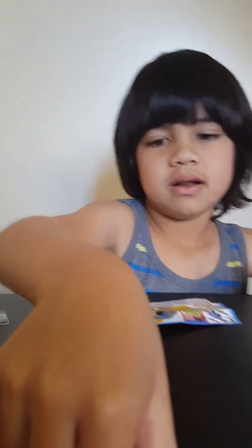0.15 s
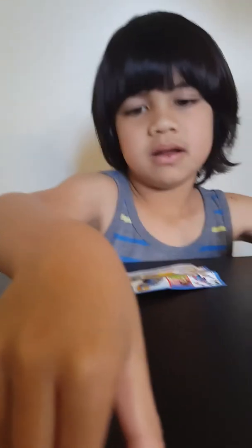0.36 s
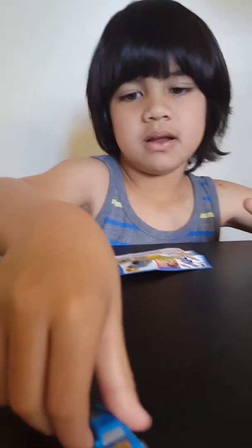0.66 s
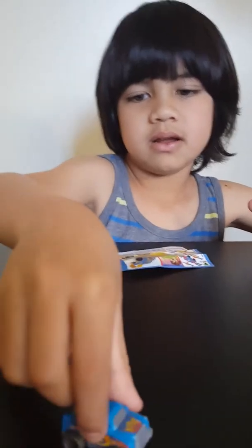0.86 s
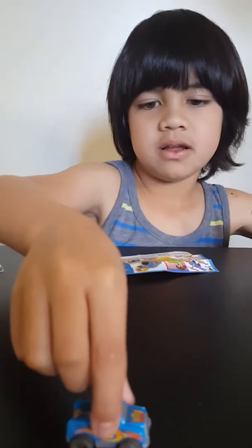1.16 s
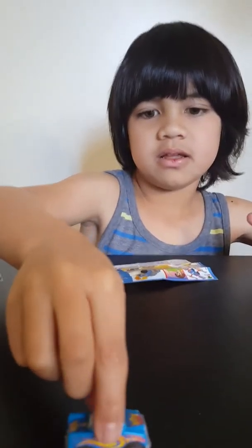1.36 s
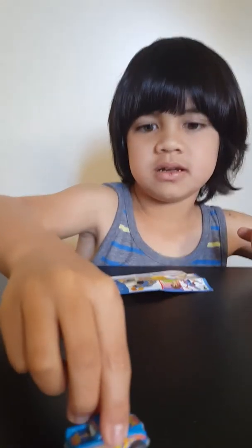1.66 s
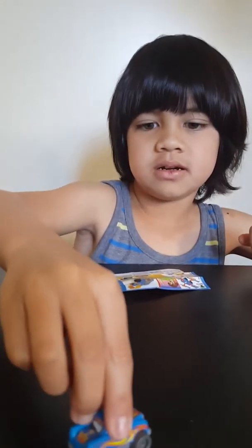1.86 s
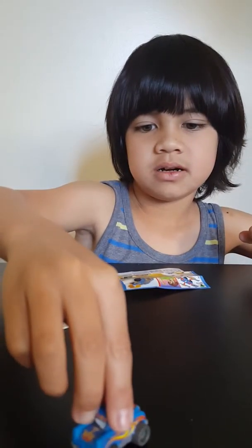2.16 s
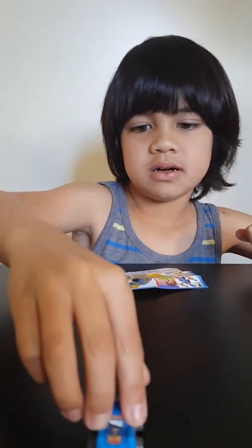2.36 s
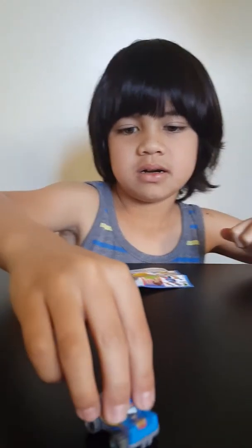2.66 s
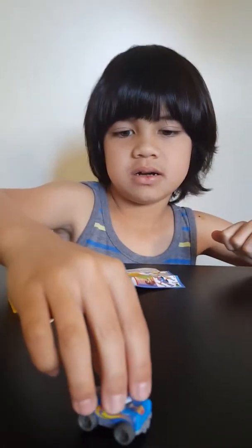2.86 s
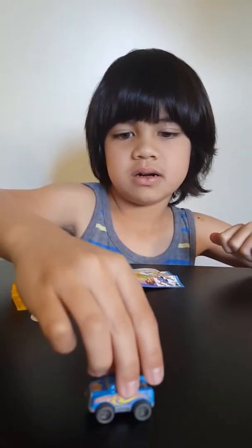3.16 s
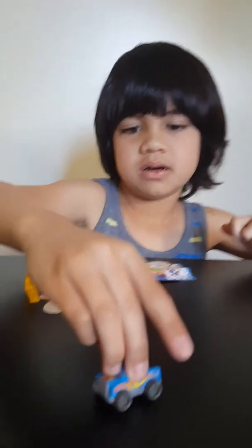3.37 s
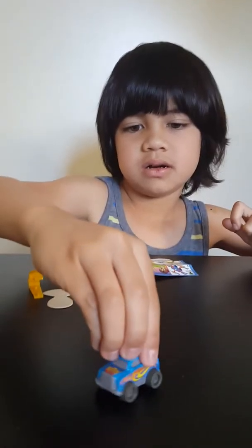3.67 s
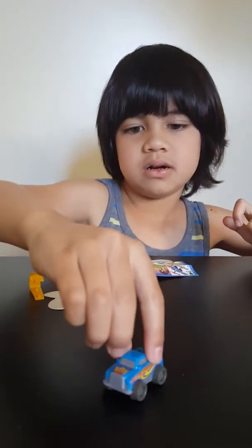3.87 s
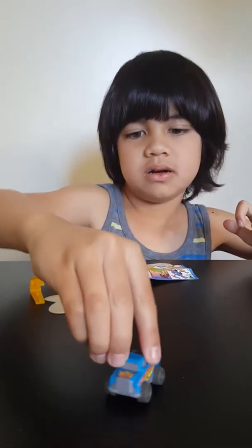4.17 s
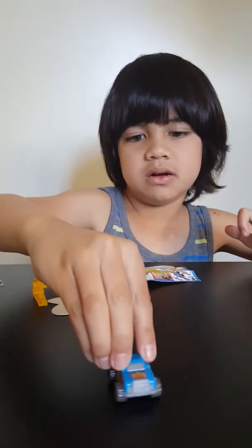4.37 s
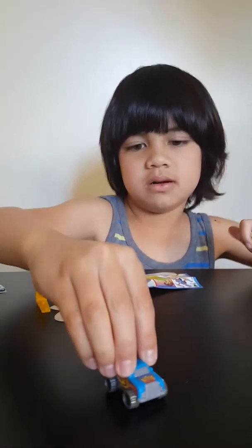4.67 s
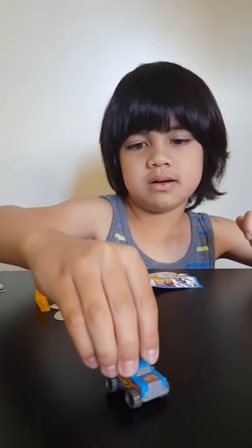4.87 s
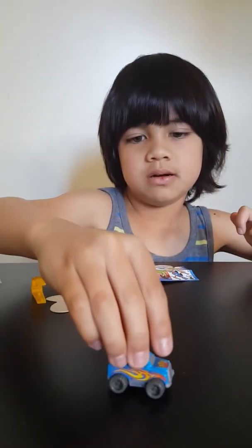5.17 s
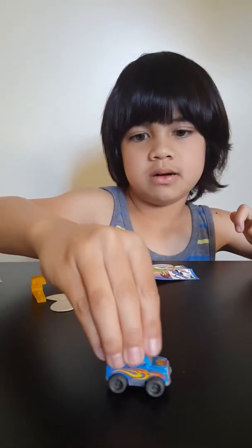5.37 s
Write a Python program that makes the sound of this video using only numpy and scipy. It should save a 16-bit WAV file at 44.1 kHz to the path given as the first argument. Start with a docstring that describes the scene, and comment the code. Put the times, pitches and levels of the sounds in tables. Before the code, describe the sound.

Close, dry scraping and hollow rattling of a toy car's wheels on a tabletop, strongest early, then fading into lighter scuffs toward the left.

```python
"""Toy car on a wooden table

A small plastic toy car is pushed in uneven spurts over a wooden table, close to a camera that stands on it.
Bursts of tiny random blows ring the tabletop modes and rasp in the hollow shell; filtered noise makes
the hiss and axle ticks at the right microphone. Rough low noise and wavering sines rumble under presses,
and trains of soft pulses make a few knocks. The car drifts away to the left, in a quiet room.
"""
import sys
import numpy as np
from scipy import signal
from scipy.fft import rfft, irfft
from scipy.io import wavfile
from scipy.ndimage import map_coordinates

SR = 44100
rng = np.random.default_rng(int(sys.argv[2]) if len(sys.argv) > 2 else 0)


def master(y):
    """Save y as 16-bit WAV."""
    cut = np.clip(np.atleast_2d(y).T, -1, 1)
    pcm = np.round(cut * 32767)  # scale
    wavfile.write(sys.argv[1], SR, pcm.astype(np.int16))


N = 243873
TIME = np.arange(N) / SR  # s
HZ = np.fft.rfftfreq(16384, 1 / SR)  # frequency grid of the filters

# Path of the car, and which tabletop modes it shakes best on the way; all levels relative:
# (time [s], left over right [dB], low modes [dB], upper over middle modes [dB])
CAR_PATH = [(0.18, -8, -11, -2.5), (0.54, -6.5, 6, -1.5), (0.72, -4.5, -0.5, -5), (1.08, -4.5, 0, 3),
            (1.23, -2.5, -7.5, -10), (1.45, -6.5, -1, 1.5), (1.85, -2.5, 3, 3), (2.03, -4.5, -13.5, -13.5),
            (2.3, -3.5, -1.5, -5.5), (2.55, -4.5, -6, 5.5), (2.72, -2, -10, 0), (3.0, -1.5, -3.5, .5),
            (3.3, 1, -2, 4.5), (3.44, 3, 5, 10), (3.72, 8.5, -2, 9.5), (3.82, 6, -4.5, -3),
            (4.2, 6.5, 1, 12), (4.45, 8.5, 2.5, 3), (4.97, 8, -1, 3), (5.05, 5.5, 3, 1), (5.15, 6, 8, 4),
            (5.29, 18, -19, 7)]
# Pushes of the hand, relative levels; the rasp level also drives the rolling hiss:
# (start [s], length [s], rise [s], tabletop ring [dB], rasp of the wheels [dB])
HAND_PUSHES = [(0.0, 0.05, 0.0027, -38.5, -45), (0.06, 0.14, 0.036, -43, -50.5),
               (0.122, 0.097, 0.052, -32, -35), (0.25, 0.059, 0.0079, -41.5, -42),
               (0.35, 0.083, 0.02, -56.5, -51.5), (0.45, 0.021, 0.0034, -43, -42.5),
               (0.48, 0.19, 0.029, -45.5, -47.5), (0.62, 0.11, 0.037, -41, -41.5),
               (0.755, 0.051, 0.0035, -45.5, -46), (0.825, 0.11, 0.026, -38.5, -43.5),
               (0.98, 0.026, 0.005, -49.5, -49), (1.033, 0.017, 0.0075, -36.5, -42.5),
               (1.205, 0.011, 0.006, -46, -55), (1.22, 0.033, 0.016, -43, -58.5),
               (1.36, 0.0076, 0.0029, -48.5, -54), (1.426, 0.011, 0.0051, -44, -50.5),
               (1.478, 0.012, 0.0093, -42.5, -46), (1.528, 0.039, 0.023, -44.5, -46.5),
               (1.66, 0.051, 0.016, -52, -59.5), (1.765, 0.1, 0.076, -50, -54.5),
               (2.022, 0.016, 0.0038, -42.5, -57), (2.058, 0.066, 0.024, -50, -62.5),
               (2.21, 0.085, 0.012, -40, -48.5), (2.28, 0.068, 0.033, -37.5, -44),
               (2.46, 0.067, 0.025, -43.5, -55.5), (2.512, 0.08, 0.02, -32.5, -42),
               (2.606, 0.12, 0.016, -36, -46), (2.835, 0.023, 0.0071, -44, -57.5),
               (2.88, 0.25, 0.09, -45, -53.5), (2.997, 0.029, 0.023, -41, -42),
               (3.15, 0.12, 0.038, -46, -56.5), (3.27, 0.037, 0.014, -41.5, -52),
               (3.372, 0.035, 0.0074, -50, -56), (3.49, 0.0065, 0.0039, -59.5, -60),
               (3.594, 0.011, 0.0062, -54.5, -61), (3.62, 0.098, 0.014, -61.5, -70),
               (3.688, 0.054, 0.022, -47, -53.5), (3.755, 0.047, 0.031, -46.5, -51.5),
               (4.13, 0.022, 0.0067, -51.5, -59.5), (4.19, 0.041, 0.013, -45, -50),
               (4.294, 0.11, 0.037, -44.5, -47), (4.42, 0.02, 0.0085, -51.5, -65),
               (4.525, 0.02, 0.0089, -54.5, -70), (4.648, 0.043, 0.0038, -58.5, -68),
               (4.948, 0.075, 0.02, -46.5, -49), (5.085, 0.056, 0.015, -53.5, -52),
               (5.264, 0.012, 0.0084, -55, -91)]
# Resonant modes of the wooden tabletop, relative levels:
# (frequency [Hz], nominal width [Hz], left microphone [dB], right microphone [dB])
TABLE_MODES = [(168.6, 21, -37, -15), (279.7, 13.1, 2.5, -1), (340, 51, -13, -10.5), (442, 35.7, -5.5, 0),
               (557, 59, -21, -5.5), (648.6, 38, 0.5, 3.5), (834, 34.4, -7, -4.5), (858.4, 29, -3.5, -7),
               (850, 184, -7, -7), (1236, 49, -12.5, -78)]
# Spectrum of the low shaking of the wood: (frequency [Hz], relative level [dB])
RUMBLE_SPECTRUM = [(25, -37), (55, -16), (90, -5.5), (135, 1.5), (200, -14), (400, -13.5), (1000, -50),
                   (4000, -67)]

RASP_RELEASE_S = 0.022  # the shell's rasp dies with the push


def amp(db):
    """Amplitude factor of a level in dB."""
    return 10 ** (np.asarray(db) / 20)


def unit(x):
    """Scales to an rms of one."""
    return x / np.sqrt(np.mean(x ** 2) + 1e-20)


def curve(rows, axis=1):
    """One column of a table, joined by straight lines in time."""
    rows = np.array(rows)
    return np.interp(TIME, rows[:, 0], rows[:, axis])


def read(points, hz):
    """One value per frequency, joined by straight lines in log frequency."""
    f, value = np.transpose(points)
    return np.interp(np.log(hz + 1), np.log(f + 1), value)


def ring(x, gain):
    """Passes x through the causal minimum-phase filter that has this gain at HZ."""
    cepstrum = irfft(np.log(np.maximum(gain, 1e-5)))
    half = cepstrum.shape[-1] // 2
    # folding the cepstrum forward puts the energy as early as possible
    cepstrum[..., 1:half] *= 2
    cepstrum[..., half + 1:] = 0
    taps = irfft(np.exp(rfft(cepstrum)))[..., :half]
    return signal.fftconvolve(np.atleast_2d(x), np.atleast_2d(taps), axes=1)[:, :N]


def resonances(modes, skirt, damping=1):
    """Gain of the modes at both microphones; skirt sets how steeply each falls away, damping widens them."""
    power = 0
    for hz, width, left, right in modes:
        detuning = 2 * (HZ - hz) / (width * damping)
        power = power + amp([[left], [right]]) ** 2 / (1 + detuning ** 2 / skirt) ** skirt
    return np.sqrt(power)


def body(blows, modes, skirt):
    """Blows ring a set of modes, with the same filter power at both microphones."""
    gain = resonances(modes, skirt)
    return ring(blows, gain / np.sqrt(np.mean(gain ** 2, 1, keepdims=True)))


def wander(rate_hz):
    """Slow random drift of rms one: noise that falls away above rate_hz."""
    hz = np.fft.rfftfreq(N, 1 / SR)
    spectrum = rfft(rng.standard_normal(N)) / (1 + (hz / rate_hz) ** 4)
    return unit(irfft(spectrum, N))


def pan(db):
    """Left and right gains of constant power from a left-over-right level."""
    gains = amp(np.array([db, -db]) / 2)
    return gains / np.sqrt(np.mean(gains ** 2, 0))


def grit(per_s, spread_db, judder_db, judder_hz, apart):
    """Tiny blows of wheel on wood, bunched as the wheels judder; each microphone hears some on its own."""
    size = amp(spread_db * np.minimum(rng.exponential(1, (3, N)), 4))
    struck = rng.random((3, N)) < per_s / SR
    blows = size * rng.standard_normal((3, N)) * struck
    both = unit(blows[0] + apart * blows[1:])  # row 0 is common to both microphones
    return unit(both * amp(judder_db * wander(judder_hz)))


def strokes(rows, release_s, axis=3):
    """Force of hand strokes: each rises, holds, lets go and leaves a faint creep; axis picks the dB column."""
    coast_db, coast_s = -17.5, 0.12  # the car creeps on a little
    power = np.zeros(N)
    t = TIME[:SR]
    for row in rows:
        start, length, rise = row[:3]
        after = np.maximum(t - length, 0)
        fall = np.maximum(np.exp(-after / release_s), amp(coast_db) * np.exp(-after / coast_s))
        force = amp(row[axis]) * np.minimum(t / rise, 1) * fall
        part = power[max(round(start * SR), 0):][:SR]
        part += (force ** 2)[:len(part)]
    return np.sqrt(power)


def placed(x, strength):
    """Level and arrival time follow the car: the farther microphone hears it later; strength scales the pan."""
    lag_s_per_db, lag_max_s = 0.00005, 0.00019
    balance_db = curve(CAR_PATH)
    lag_s = np.clip(-lag_s_per_db * balance_db, -lag_max_s, lag_max_s)
    shift = lag_s * SR / 2  # half the lag for each side, in samples
    at = np.arange(N)
    late = [map_coordinates(c, [at - sign * shift], order=3) for c, sign in zip(x, (1, -1))]
    return np.array(late) * pan(strength * balance_db)


def tabletop():
    """The rolling wheels keep the wooden modes ringing, in three bands whose weights follow the car."""
    blows = grit(per_s=3500, spread_db=0.83, judder_db=0.98, judder_hz=61, apart=0.82)
    force = strokes(HAND_PUSHES, release_s=0.026)
    sound = rfft(body(blows * force, TABLE_MODES, skirt=1.82))
    hz = np.fft.rfftfreq(N, 1 / SR)
    below = 1 / (1 + (hz / 420) ** 8)
    above = 1 - 1 / (1 + (hz / 735) ** 24)
    low, middle, upper = (irfft(sound * band, N) for band in (below, 1 - below - above, above))
    low_gain = amp(curve(CAR_PATH, axis=2) + 3.0)
    upper_gain, middle_gain = pan(curve(CAR_PATH, axis=3))  # pan here trades upper against middle
    mix = low * low_gain + middle * middle_gain + upper * upper_gain
    return amp(-1.0) * placed(mix, strength=1.0)


def shell():
    """The same rolling rattles the hollow plastic body, whose broad higher modes turn it into a rasp."""
    # Modes of the plastic shell, relative levels:
    # (frequency [Hz], width [Hz], left microphone [dB], right microphone [dB])
    shell_modes = [(1451, 376, 6.5, 0), (1738, 48, 10, -38), (1923, 123, 3.5, -4.5), (2260, 294, 2.5, -3.5),
                   (2644, 560, -12, -6), (3002, 202, -7.5, -4.5), (3330, 840, -12.5, -17.5),
                   (4160, 780, -15, -21.5), (5600, 1200, -24.5, -24.5), (7980, 550, -21, -25.5)]
    blows = grit(per_s=3500, spread_db=2.5, judder_db=1.34, judder_hz=108, apart=1.0)
    force = strokes(HAND_PUSHES, RASP_RELEASE_S, axis=4)
    rasp = body(blows * force, shell_modes, skirt=1.57)
    return amp(-2.17) * placed(rasp, strength=1.41) * pan(np.array([-1.5]))


def scrape():
    """Sliding plastic hisses and axles catch and slip in sharp ticks, nearly all at the right microphone."""
    # Wheels skidding sideways near the right microphone:
    # (start [s], length [s], rise [s], relative hiss level [dB])
    skids = [(0.0, 0.093, 0.0013, -47.5), (0.165, 0.098, 0.06, -29.5), (0.33, .41, 0.12, -42.5),
             (0.78, 0.11, 0.0081, -55.5), (1.545, 0.0069, 0.0052, -61), (2.215, 0.17, 0.023, -66.5),
             (2.55, 0.092, 0.079, -52), (3.2, 0.26, 0.025, -70)]
    # Axles catching and slipping: (time [s], relative level [dB])
    axle_ticks = [(0.463, -25), (1.027, -37.5), (1.059, -41), (1.091, -45), (1.111, -43.5), (1.137, -69),
                  (1.168, -49), (1.555, -41), (2.025, -44.5), (2.622, -33)]
    # Spectrum of hiss and ticks: (frequency [Hz], relative level [dB])
    hiss_spectrum = [(1500, -18.5), (3300, -4.5), (4600, -8.5), (5300, -4.5), (6200, -1), (7400, -6),
                     (8800, -11.5), (11000, -15), (13500, -14), (16000, -8)]
    # plain rolling hisses too, less while the car is on the left
    rolling_gain = amp(-20 - np.maximum(curve(CAR_PATH), 0))
    rolling = strokes(HAND_PUSHES, RASP_RELEASE_S, axis=4) * rolling_gain
    force = np.hypot(strokes(skids, release_s=0.037), rolling)
    blows = grit(per_s=10000, spread_db=1.5, judder_db=1.5, judder_hz=109, apart=3.5)
    hiss = blows * force * amp(-3.0)
    t = TIME[:SR // 50]
    for start, db in axle_ticks:
        tick = np.exp(-t / 0.003) * rng.standard_normal((2, len(t)))
        hiss[:, round(start * SR):][:, :len(t)] += amp(db - 11) * tick
    return ring(hiss, unit(amp(read(hiss_spectrum, HZ)))) * amp([[-24], [0]])


def room_tone():
    """Steady quiet background noise, partly shared by both microphones, most of all in the bass."""
    # Spectrum of the background: (frequency [Hz], relative level [dB])
    tone_spectrum = [(15, -23), (45, -4.5), (100, -3.5), (210, -14.5), (285, -4.5), (370, -16.5),
                     (650, -13), (1400, -21), (4000, -29.5), (8500, -36), (15000, -33.5)]
    noise = rng.standard_normal((3, N))
    gain = amp(read(tone_spectrum, HZ))
    shared = 0.86 / (1 + (HZ / 700) ** 2)  # share of the power
    common = ring(noise[0], gain * np.sqrt(shared))
    separate = ring(noise[1:], gain * np.sqrt(1 - shared))
    return amp(-65.5) * unit(common + separate)


def room(x):
    """A short tail of sparse reflections, dying faster in the treble."""
    # Reverberation: (frequency [Hz], time to fall by 60 dB [s])
    decay_times = [(200, 0.32), (1000, 0.11), (10000, 0.086)]
    reflected = rng.random((2, SR // 2)) < 3000 / SR  # 3000 reflections a second
    taps = rng.standard_normal((2, SR // 2)) * reflected
    taps[:, :SR // 200] = 0  # none in the first 5 ms
    hz, t, z = signal.stft(taps, SR, nperseg=256)
    decay = amp(-60 * t / read(decay_times, hz)[:, None])
    tail = signal.istft(z * decay, SR, nperseg=256)[1]
    return signal.fftconvolve(x, tail / np.linalg.norm(tail[0]), axes=1)[:, :N]


def rumble():
    """Wheels sticking and slipping shake the wood and rock the camera, its left end after its right."""
    # The hand bears down and the wheels judder, relative levels:
    # (start [s], length [s], rise [s], rumble [dB], mean slips a second [Hz])
    presses = [(0.169, 0.074, 0.027, -41.5, 133), (0.365, 0.12, 0.035, -43, 83),
               (0.494, 0.16, .02, -45, 102), (0.693, 0.084, 0.016, -43.5, 138),
               (0.798, 0.054, 0.015, -49.5, 140), (0.98, .03, 0.0058, -43, 170),
               (1.04, 0.051, 0.013, -50.5, 69), (1.445, 0.13, .015, -61, 110), (2.3, 0.049, .03, -56, 105),
               (2.545, 0.25, .02, -59.5, 113), (2.658, 0.013, 0.013, -46.5, 100),
               (2.879, 0.023, 0.0054, -40, 90), (2.957, 0.32, 0.018, -55, 178)]
    release_s, rock_s = 0.027, 0.0034  # rock_s: delay of the left end
    judder_share = 0.45  # regular part of the rumble's power
    blows = grit(per_s=1100, spread_db=-0.5, judder_db=1.5, judder_hz=23.9, apart=0.81)
    rough = ring(blows * strokes(presses, release_s), unit(amp(read(RUMBLE_SPECTRUM, HZ))))
    clock = np.cumsum(1 + 0.0793 * wander(rate_hz=23.4)) / SR  # wavering time for the slips
    judder = np.zeros(N)
    for row in presses:
        slips = np.sqrt(2) * np.sin(2 * np.pi * row[4] * clock)
        judder += strokes([row], release_s) * slips
    left, right = np.sqrt(1 - judder_share) * rough + np.sqrt(judder_share) * judder
    left = np.interp(TIME - rock_s, TIME, left)
    return np.array([left, right]) * amp([[-9], [1]])


def knocks():
    """The pressed car stutters: trains of soft slips die away, their long contact favouring the low modes."""
    # Knocks on the wood, relative levels:
    # (time [s], level [dB], contact time [s], left over right [dB], stutter length [s])
    stutters = [(0.458, -44, 0.0013, -1, .004), (0.977, -47, 0.0011, -3, 0.017),
                (1.057, -47, 0.0006, 0, 0.0076), (2.886, -34.5, 0.0019, 0.5, 0.025),
                (3.256, -46.5, 0.0022, 9, 0.018), (3.398, -41, 0.0028, 30, 0.0069)]
    slip_hz = 137.3  # slips a second
    force = np.zeros((2, N))
    for start, db, contact, side_db, length in stutters:
        u = TIME[:SR // 20] / (contact / np.pi / 2)
        blow = u * np.exp(-u)
        blow = blow / np.sum(blow)
        for delay in np.arange(8) / slip_hz:
            size = amp(db) * np.exp(-(delay / length) ** 4)
            force[:, round((start + delay) * SR):][:, :len(u)] += pan(np.array([side_db])) * size * blow
    thud = amp(read(RUMBLE_SPECTRUM, HZ) - 21.5) * amp([[-7], [0]])
    dull = 1 / np.sqrt(1 + (HZ / 420) ** 6)  # the hand damps the upper modes
    radiated = HZ ** 2 / (HZ ** 2 + 85 ** 2)  # a steady push makes no sound
    modes = resonances(TABLE_MODES, skirt=1.04, damping=1.14) * dull
    return amp(55.5) * ring(force, (modes + thud) * radiated)


def scene():
    """The car on its table with a little of the room, the close sounds, and the background."""
    car = tabletop() + shell() + knocks()
    return car + amp(-16.5) * room(car) + scrape() + rumble() + room_tone()


def record(dry):
    """A steep linear-phase low-pass at 15780 Hz limits the band at the microphones."""
    taps = signal.firwin(511, 15780, window=("kaiser", 9), fs=SR)
    return signal.oaconvolve(dry, taps[None], "same")


dry = scene()
out = record(dry)
master(out)
```